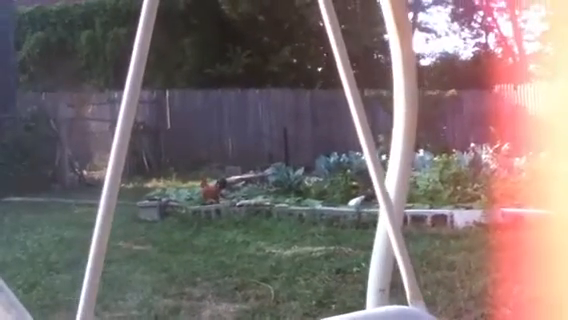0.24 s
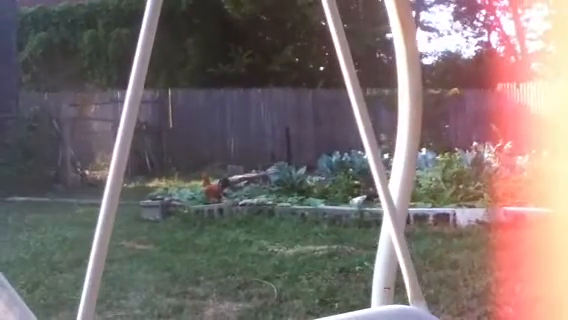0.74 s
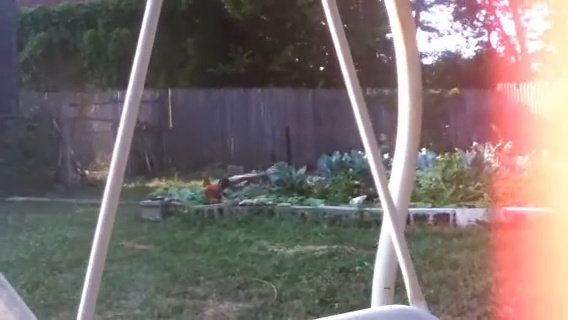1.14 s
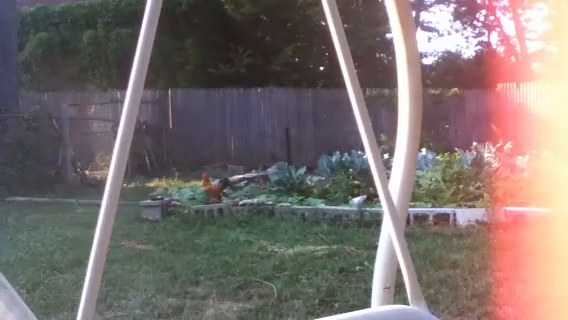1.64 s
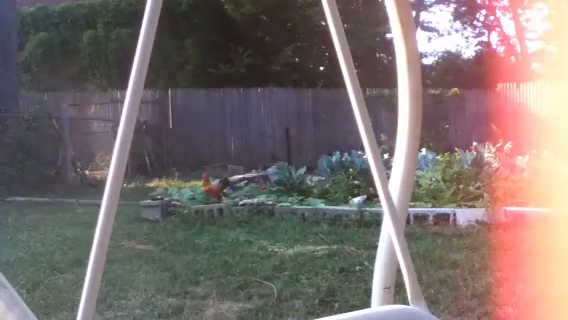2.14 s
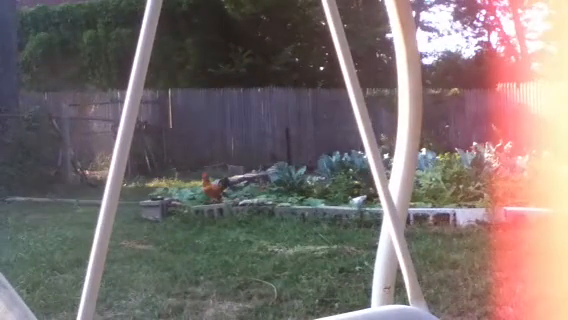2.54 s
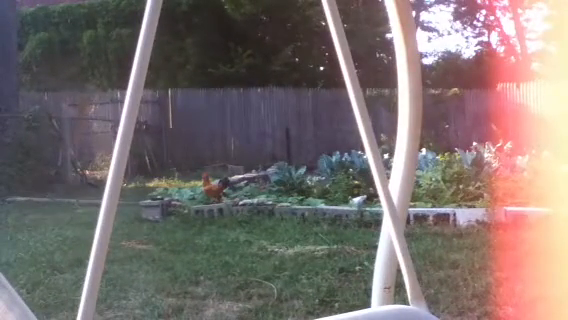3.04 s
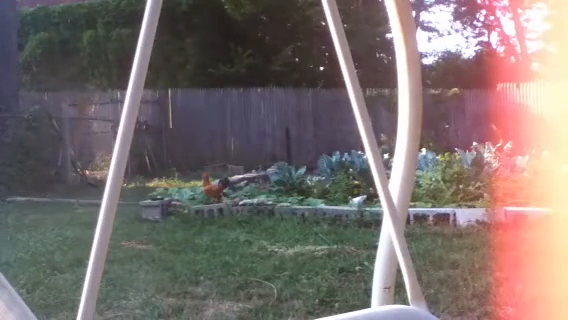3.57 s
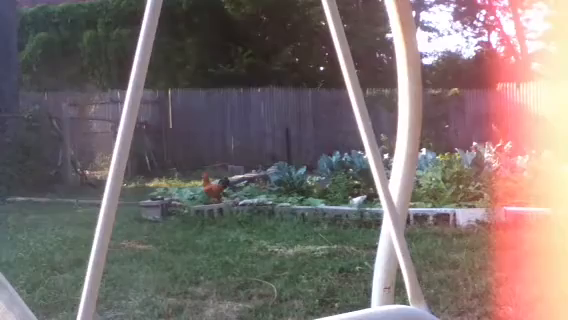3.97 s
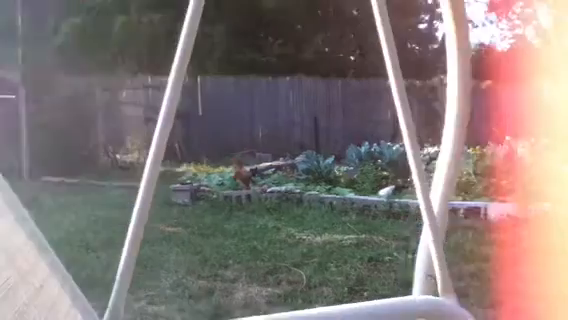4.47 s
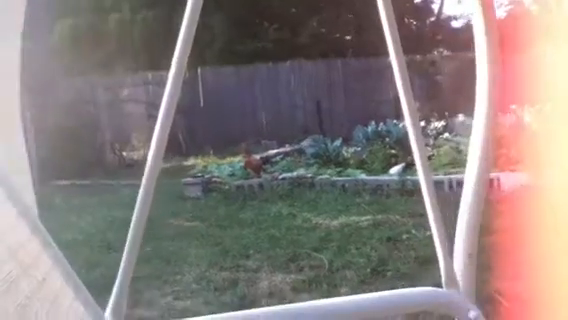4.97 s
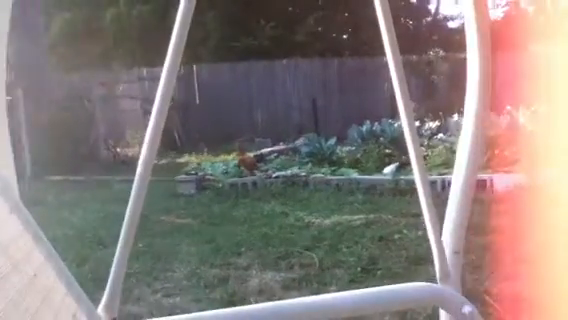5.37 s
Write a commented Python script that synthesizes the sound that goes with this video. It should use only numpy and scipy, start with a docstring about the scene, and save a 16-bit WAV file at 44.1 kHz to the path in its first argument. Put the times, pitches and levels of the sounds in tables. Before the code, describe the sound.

A rooster crows once, loud and raspy, over faint cricket chirps and a low, distant town rumble.

```python
"""Crickets chirp on a back lawn at dusk, over a far insect chorus and town rumble.
Then a rooster crows, much louder: two short syllables and a long one. Its voice box flips
between a bright low register (a way of vibrating), a purer high one and a chaotic rasp.
Fences and walls echo the crow. The crickets make each chirp with a few wing strokes."""
import sys
import numpy as np
from scipy import signal
from scipy.fft import rfft, irfft, next_fast_len
from scipy.io import wavfile
from scipy.ndimage import uniform_filter1d

SR = 44100
rng = np.random.default_rng(int(sys.argv[2]) if len(sys.argv) > 2 else 0)


def bounce(signal):
    """Save signal as a 16-bit WAV file at the path given by the first command-line argument."""
    frames = np.transpose(np.atleast_2d(signal))
    limited = np.clip(frames, -1, 1)
    pcm = np.round(limited * 32767).astype(np.int16)
    wavfile.write(sys.argv[1], SR, pcm)


N = 247401
T = np.arange(N) / SR

# the tune in each register, one table a note: time_s, pitch_hz, level_db
LOW_NOTES = [
    [(1.762, 685.7, -29), (1.78, 695, -29.5), (1.796, 709.7, -23.5), (1.82, 740.3, -24.5),
     (1.864, 738.8, -23.5), (1.89, 717.7, -30.5), (1.9, 732.3, -40), (1.92, 751, -32.5), (1.935, 720, -52)],
    [(2.098, 711.5, -41), (2.108, 736.7, -33.5), (2.12, 781.8, -28), (2.137, 811.8, -29),
     (2.15, 803.2, -33), (2.185, 793.4, -33), (2.24, 776, -30), (2.27, 784, -31.5), (2.285, 803, -34.5)],
    [(2.39, 794.6, -27.5), (2.405, 798.3, -33), (2.416, 750.8, -29.5), (2.435, 738.9, -29),
     (2.47, 757.5, -42)],
    [(2.65, 662.7, -39.5), (2.66, 683.4, -42), (2.675, 717, -33), (2.69, 744.9, -32), (2.707, 767.4, -33.5),
     (2.74, 753.5, -32.5), (2.775, 756.4, -34), (2.825, 752.2, -32.5), (2.835, 746, -43)],
    [(3.483, 670, -30.5), (3.493, 689.3, -29), (3.53, 690.3, -29.5), (3.57, 688, -30), (3.6, 677, -28),
     (3.617, 674.7, -30), (3.627, 654, -36.5)],
    [(3.63, 613.1, -43), (3.7, 591, -37), (3.755, 579, -37.5), (3.775, 571, -37), (3.8, 562.3, -33.5),
     (3.825, 530.6, -38), (3.845, 503.6, -38)],
]
HIGH_NOTES = [
    [(2.148, 959.6, -25), (2.165, 970.2, -26), (2.22, 954.2, -24), (2.255, 927.3, -30), (2.27, 960, -33.5)],
    [(2.275, 967.6, -31), (2.284, 1038, -21.5), (2.298, 1064, -21.5), (2.312, 1099, -23.5),
     (2.376, 1102, -21), (2.39, 1040, -26.5), (2.415, 992, -35), (2.43, 955, -45.5)],
    [(2.826, 937.3, -34), (2.833, 902.5, -28.5), (2.85, 877.8, -28), (2.88, 876.2, -27.5),
     (3.0, 870.7, -29.5), (3.09, 864.6, -27), (3.21, 857, -31), (3.25, 870.2, -28.5), (3.42, 882.1, -33.5),
     (3.485, 892, -46.5)],
]
# harmonics as the neck and beak colour them, one table a note: pitch_multiple, gain_db
LOW_HARMONICS = [
    [(1, -23), (2, -7.5), (3, -0.5), (4, -17), (5, -29.5), (6, -29.5), (7, -13), (8, -21), (9, -19.5),
     (10, -23.5), (11, -29), (12, -33.5)],
    [(1, -14), (2, 2), (3, -1), (4, -5), (5, -13), (6, -34), (7, -26.5), (8, -36), (9, -21), (10, -28.5),
     (11, -31), (12, -33.5), (13, -34), (14, -50), (15, -40.5), (16, -35)],
    [(1, -19.5), (2, 2.5), (3, -2.5), (4, -1.5), (5, -9.5), (6, -35.5), (7, -25), (8, -37)],
    [(1, -10), (2, 3), (3, 1.5), (4, -6.5), (5, -15), (6, -27), (7, -13.5), (8, -52.5), (9, -17.5),
     (10, -37), (11, -30.5), (12, -28), (13, -35)],
    [(1, -16.5), (2, -3.5), (3, -1.5), (4, -5), (5, -13), (6, -17.5), (7, -34.5), (8, -27.5), (9, -32.5),
     (10, -23), (11, -36.5), (12, -17), (13, -35), (14, -42)],
    [(1, -21), (2, 1.5), (3, 0.5), (4, -5.5), (5, -16.5), (6, -17.5), (7, -22), (8, -31.5)],
]
HIGH_HARMONICS = [
    [(1, 2), (2, -3.5), (3, -14.5), (4, -21.5)],
    [(1, 0.5), (2, 0.5), (3, -11), (4, -16.5), (5, -31), (6, -28.5), (7, -30), (8, -29), (9, -41.5),
     (10, -47), (11, -51.5), (12, -46.5)],
    [(1, 2.5), (2, -1.5), (3, -23.5), (4, -22), (5, -25.5), (6, -33), (7, -54), (8, -26.5), (9, -40.5),
     (10, -41.5), (11, -42.5)],
]
# the texture of each note: calm_wobble_percent, rasp_db, rasp_tilt_db, beak_air_db
LOW_TEXTURE = [(0.36, -46.5, 16, -69.5), (0.303, -44, 12.5, -59.5), (.3, -48.5, 4.5, -61.5),
               (0.246, -45.5, 11.5, -66.5), (0.2015, -50, 12, -70.5), (.3, -47, -1, -80.5)]
HIGH_TEXTURE = [(0.091, -47.5, 4.6, -80), (.55, -45, 11, -63), (0.072, -56.5, 10.9, -84)]
# every second cycle is stronger, adding tones halfway between the harmonics: time_s, gain_db
HALF_TONES = [(2.68, -37), (2.7, 1.5), (2.76, 1), (2.775, -18.5), (2.8, -1.5), (2.815, -25.5),
              (2.83, -48.5)]
# the high register breaks in: middle_s, half_length_s
HIGH_FLIPS = [(2.165, .009), (2.197, .006), (2.223, .008), (2.254, .008)]
# fast trembles of the voice: first_crest_s, length_s, rate_hz, pitch_swing_percent, level_swing_db
TREMBLES = [(1.796, .08, 43, 2.6, 1.5), (2.307, .075, 28.2, 2.4, -.5)]
# the voice breaks into a rasp: start_s, length_s, level_db, end_level_db, tilt_db (more is brighter)
RASP_BURSTS = [(1.766, 0.0152, -24, -34.5, 2), (1.895, 0.0344, -27.5, -49.5, 3.5),
               (2.1, 0.0095, -35.5, -36, 3.5), (2.148, 0.1265, -26.5, -27, 1.5),
               (2.39, 0.03446, -23, -26.5, 0.5), (2.428, 0.0588, -29.5, -40.5, 8),
               (2.63, 0.0249, -39, -28, 4.5), (2.825, 0.00965, -33.5, -28.5, -1.5),
               (3.097, .05, -40, -44, 4), (3.219, 0.105, -38, -40.5, 1), (3.26, 0.0112, -29.5, -32.5, -2.5),
               (3.336, 0.1405, -27, -28.5, 1), (3.627, 0.1285, -27.5, -32, 2),
               (3.769, 0.117, -36.5, -44, 4.5)]
# throat colour of the rasp in each short syllable, then early and late in the long one: freq_hz, gain_db
THROAT_COLOURS = [
    [(290, -65), (500, -39), (927, -0.5), (1250, -14), (1620, -1.5), (2200, -8.5), (2500, -27.5),
     (2970, -15.5), (4250, -46), (5130, -29.5), (6640, -29.5), (7890, -42), (15500, -54.5)],
    [(290, -84.5), (500, -59), (954, 3), (1270, -11.5), (1530, -2.5), (1720, -4.5), (2260, 0), (2650, -12),
     (3060, -7.5), (3480, -21.5), (4130, -18.5), (6180, -39.5), (6740, -28), (12900, -49.5), (15500, -59)],
    [(290, -70.5), (500, -53), (968, 9), (1120, -8), (2010, 1), (3060, -12.5), (3530, -19.5), (5200, -19),
     (6180, -38.5), (9110, -31.5), (15500, -58.5)],
    [(290, -77.5), (500, -59), (586, -20), (726, -21), (888, -7.5), (968, -6), (1200, -9.5), (1290, -14.5),
     (1750, -8.5), (2260, -12), (3380, -20), (4910, -49), (6930, -32.5), (13400, -61.5), (15500, -65.5)],
]
# when the throat takes its next shape: time_s
THROAT_CHANGES_S = [2.02, 2.56, 3.0]
# echoes off fences and walls: delay_s, gain_db
WALL_ECHOES = [(0.033, -7.5), (.07, -28), (.125, -29), (0.188, -42.5)]
# cricket chirps: start_s, level_db, pitch_hz, stroke_count
CRICKET_CHIRPS = [(0.292, -46.5, 4690, 2.65), (.36, -53, 4932, 2.48), (.876, -50.5, 4710, 2.74),
                  (.925, -52, 6040, 1.54), (1.126, -56.5, 4910, 2.9), (1.216, -57, 4400, 3.35),
                  (1.432, -50, 4676, 2.97), (3.795, -51, 4820, 2.93), (4.638, -52.5, 4920, 2.37),
                  (4.85, -61, 4410, 2.8), (5.168, -53, 4920, 2.53), (5.297, -53, 4646, 3.55),
                  (5.465, -52, 4860, 1.95)]
# bands of far insects: pitch_hz, width_hz, loudest_db, loudest_at_s, swell_period_s, dip_db
INSECT_BANDS = [(1437.5, 25, -69, 0.46, 4.3, 9), (3393, 270, -72.5, 1.67, 3.1, 4),
                (5474, 220, -68, 4.17, 5, 11), (5729, 400, -66.5, 2.77, 9.96, 9),
                (8400, 230, -70, 1.6, 5.2, 10.5)]
# colour of the town's rumble and hiss: freq_hz, gain_db
TOWN_COLOUR = [(12, -58), (20, -36.5), (39, -19.5), (59, -3), (157, -1), (252, -10), (521, -13.5),
               (1270, -13.5), (1460, -16), (2280, -22.5), (4090, -21), (4700, -23), (5260, -22),
               (8440, -25.5), (15600, -33)]


def rooster():
    """The whole crow. Early in the second syllable one register swells while the other is choked."""
    high_turn = sum(np.exp(-((T - middle_s) / half_s) ** 4) for middle_s, half_s in HIGH_FLIPS)
    taking_turns = (T > HIGH_NOTES[0][0][0]) & (T < HIGH_NOTES[0][-1][0])
    low_turn = taking_turns * (1 - high_turn)
    low = voice_register(LOW_NOTES, LOW_HARMONICS, LOW_TEXTURE, fade_s=.006, duck_db=-13 * high_turn)
    high = voice_register(HIGH_NOTES, HIGH_HARMONICS, HIGH_TEXTURE, fade_s=.004, duck_db=-15 * low_turn)
    return low + high + voice_rasp() + beak_air()


def voice_register(notes, harmonics, textures, fade_s, duck_db):
    """The voice box sings a stack of harmonics; the more rasp, the more pitch and level wobble."""
    rasp_gain = envelopes(*np.transpose(RASP_BURSTS)[:4]).sum(axis=0)
    rasp_wobble = 1.9 * rasp_gain / undb(-27)  # 1.9 percent more when the rasp is at -27 dB
    wander = (drift(160) + .7 * drift(700)) / 100
    shimmer_db = 1.2 * drift(130)
    half_tone_db = np.interp(T, *np.transpose(HALF_TONES))
    # the overtones of the held note sink, then snap back at 3.212 s
    from_choke = np.maximum((3.212 - T) / .055, (T - 3.212) / .006)
    choke_db = -20 * np.clip(1 - from_choke, 0, 1) ** .5
    bend, swing_db = voice_tremble()
    out = np.zeros(N)
    for note, timbre, texture in zip(notes, harmonics, textures):
        time_s, pitch_hz, level_db = np.transpose(note)
        on = slice(int(time_s[0] * SR), int(time_s[-1] * SR))
        t = T[on]
        wobble = texture[0] + rasp_wobble[on]
        sung_hz = np.interp(t, time_s, pitch_hz) * (bend[on] + wobble * wander[on])
        phase = 2 * np.pi * np.cumsum(sung_hz) / SR
        fade = np.clip(np.minimum(t - time_s[0], time_s[-1] - t) / fade_s, 0, 1)
        sung_db = np.interp(t, time_s, level_db) + wobble * shimmer_db[on] + swing_db[on] + duck_db[on]
        gain = np.sqrt(2) * fade * undb(sung_db)
        for multiple in np.arange(1, len(timbre) + .5, .5):
            tone_db = np.interp(multiple, *np.transpose(timbre)) + (multiple % 1 > 0) * half_tone_db[on]
            if tone_db.max() < -60:  # too quiet to hear
                continue
            # each tone flickers and drifts on its own, the higher ones more
            flicker_db = min(multiple, 5) * np.minimum(.25 + .4 * wobble, .7) * drift(110, len(t))
            slow_db = min(multiple - 1, 4) * .7 * drift(18, len(t) + SR)[:len(t)]
            tone_db = tone_db + flicker_db + slow_db + (multiple > 1) * choke_db[on]
            out[on] += gain * undb(tone_db) * np.sin(multiple * phase + rng.uniform(0, 2 * np.pi))
    return out


def voice_tremble(fade_s=.013):
    """The voice trembles quickly: gives a pitch multiplier and a level change in dB."""
    bend, swing_db = np.ones(N), np.zeros(N)
    for crest_s, length_s, rate_hz, percent, db in TREMBLES:
        fade = np.clip(1 + np.minimum(T - crest_s, crest_s + length_s - T) / fade_s, 0, 1)
        tremble = np.cos(2 * np.pi * rate_hz * (T - crest_s)) * fade
        bend += percent / 100 * tremble
        swing_db += db * tremble
    return bend, swing_db


def voice_rasp(rate_hz=900, jitter=.3, scatter_db=2.2):
    """Membranes in the voice box slap with uneven timing and strength, making the throat ring."""
    gap_luck, size_luck = rng.standard_normal((8000, 2)).T
    slap_at = np.cumsum(SR / rate_hz * np.exp(jitter * gap_luck)).astype(int)
    slaps = np.zeros(N)
    slaps[slap_at[slap_at < N]] = undb(scatter_db * size_luck[slap_at < N])
    # loud bursts, plus a faint breathy rasp under every note
    bursts = np.transpose(RASP_BURSTS)
    _, breathy_db, breathy_tilt_db, _ = np.transpose(LOW_TEXTURE + HIGH_TEXTURE)
    gains = np.vstack([envelopes(*bursts[:4]), note_envelopes(breathy_db)]) + 1e-9
    tilt_db = np.append(bursts[4], breathy_tilt_db) @ gains / gains.sum(axis=0)
    gain = np.sqrt((gains ** 2).sum(axis=0)) * undb(2.0 * drift(60))
    rings = [coloured(slaps, colour) for colour in THROAT_COLOURS]
    ring = np.choose(np.searchsorted(THROAT_CHANGES_S, T), rings)
    body = filtered(ring, lambda f: 1 / (1 + (f / 1500) ** 4))
    treble = filtered(ring, lambda f: 1 / (1 + (4500 / (f + 1)) ** 4))
    middle = ring - body - treble
    return gain * (undb(-tilt_db) * body + middle + undb(2 * tilt_db) * treble)


def beak_air(centre_hz=12960, width_hz=2200):
    """Air swirls at the beak during each note: a high, grainy sizzle."""
    band = filtered(rng.standard_normal(N), lambda f: 1 / (1 + ((f - centre_hz) / width_hz * 2) ** 4))
    air_db = np.transpose(LOW_TEXTURE + HIGH_TEXTURE)[3]
    return unit(band) * note_envelopes(air_db).max(axis=0) * undb(2.0 * drift(80))


def yard_echoes(sound, decay_s=.662, tail_db=-11, smear_s=.00386):
    """Fences and walls add a few smeared echoes and a dull tail that falls 60 dB in decay_s."""
    t = T[:SR]
    tail = rng.standard_normal(SR) * undb(-60 * t / decay_s) * (t > .01)
    echoes = unit(tail) * undb(tail_db) / np.sqrt(SR)
    for delay_s, gain_db in WALL_ECHOES:
        smear = rng.standard_normal(SR) * np.exp(-((t - delay_s) / smear_s) ** 2)
        echoes += unit(smear) * undb(gain_db) / np.sqrt(SR)
    dull_echoes = filtered(echoes, lambda f: 1 / (1 + (f / 5000) ** 2))
    return sound + signal.fftconvolve(sound, dull_echoes)[:N]


def crickets(period_s=.039, stroke_s=.012, echo_s=.014, echo_db=-5, blur_db=-2):
    """Each wing stroke is a short, falling, nearly pure tone; a wall repeats it and a hedge blurs it."""
    chirps = np.zeros(N)
    uneven_db = 2.5 * drift(150)
    for start_s, level_db, pitch_hz, stroke_count in CRICKET_CHIRPS:
        t = T - start_s
        stroke = t // period_s
        progress = np.clip(t % period_s / stroke_s, 0, 1)
        effort = np.clip(.7 + .3 * stroke, 0, 1) * np.clip((stroke_count - stroke) / 2, 0, 1) * (t >= 0)
        tone = np.sin(2 * np.pi * np.cumsum(pitch_hz * (1.02 - .045 * progress)) / SR)
        chirps += undb(level_db + uneven_db) * effort * np.sin(np.pi * progress) * tone
    wall_echo = undb(echo_db) * np.roll(chirps, int(echo_s * SR))
    t = T[:SR // 4]
    hedge = unit(rng.standard_normal(len(t)) * np.exp(-t / .0465) * (t > .01))
    blur = signal.fftconvolve(chirps, hedge * undb(blur_db) / np.sqrt(len(t)))[:N]
    return chirps + wall_echo + blur


def insect_chorus():
    """Many far insects blend into soft bands of noise that swell and throb."""
    out = np.zeros(N)
    for pitch_hz, width_hz, loudest_db, loudest_at_s, period_s, dip_db in INSECT_BANDS:
        swell_db = loudest_db - dip_db * np.sin(np.pi * (T - loudest_at_s) / period_s) ** 2
        throb_db = 1.4 * drift(3.59) + 1.7 * drift(25)
        band = filtered(rng.standard_normal(N), lambda f: 1 / (1 + ((f - pitch_hz) / width_hz * 2) ** 2))
        out += undb(swell_db + throb_db) * unit(band)
    return out


def town_rumble(level_db=-52):
    """The town's low rumble swells slowly under a smooth hiss."""
    noise = coloured(rng.standard_normal(N), TOWN_COLOUR)
    rumble = filtered(noise, lambda f: 1 / (1 + (f / 220) ** 4))
    hiss = noise - rumble
    swell_db = np.interp(T, [0, 2.5, 4.2, 5.6], [-2.0, -1.24, .12, 3.5]) + .3 * drift(2.5)
    return undb(level_db) * (hiss + undb(swell_db) * rumble)


def envelopes(start_s, length_s, level_db, end_db, rise_db_per_s=1800, fall_db_per_s=904):
    """Loudness over time, one row an event: a steep rise, a sloping hold, a slower fall."""
    t = T - np.reshape(start_s, (-1, 1))
    length_s, level_db, end_db = (np.reshape(v, (-1, 1)) for v in (length_s, level_db, end_db))
    hold_db = level_db + (end_db - level_db) * np.clip(t / length_s, 0, 1)
    return undb(hold_db - rise_db_per_s * np.maximum(-t, 0) - fall_db_per_s * np.maximum(t - length_s, 0))


def note_envelopes(level_db):
    """Envelopes that hold steady for as long as each note lasts."""
    start_s, end_s = np.transpose([(note[0][0], note[-1][0]) for note in LOW_NOTES + HIGH_NOTES])
    return envelopes(start_s, end_s - start_s, level_db, level_db)


def drift(rate_hz, n=N):
    """A smooth random wiggle of typical size 1, with rate_hz new values a second."""
    hold = int(SR / rate_hz)
    steps = np.repeat(rng.standard_normal(n // hold + 1), hold)
    return unit(uniform_filter1d(uniform_filter1d(steps, hold), hold)[:n])


def coloured(sound, colour):
    """Filter by a table of freq_hz, gain_db, then scale to level 1."""
    freq_hz, gain_db = np.transpose(colour)
    log_hz = np.log(freq_hz)
    return unit(filtered(sound, lambda f: undb(np.interp(np.log(np.maximum(f, 1)), log_hz, gain_db))))


def filtered(sound, gain_at_hz):
    """Turn each frequency up or down by its own gain."""
    n = next_fast_len(len(sound))
    return irfft(rfft(sound, n) * gain_at_hz(np.arange(n // 2 + 1) * SR / n), n)[:len(sound)]


def unit(x):
    """Scale to an average (rms) level of 1."""
    return x / np.sqrt(np.mean(x ** 2))


def undb(db):
    """Turn decibels into a multiplier."""
    return 10 ** (np.asarray(db) / 20)


def scene():
    """The echoing crow over the evening background, in one channel."""
    return (yard_echoes(rooster()) + crickets() + insect_chorus() + town_rumble())[None]


def record(dry, top_hz=15400):
    """Cut away the very highest treble."""
    return signal.sosfilt(signal.ellip(10, .2, 80, top_hz, fs=SR, output="sos"), dry)


dry = scene()
out = record(dry)
bounce(out)
```